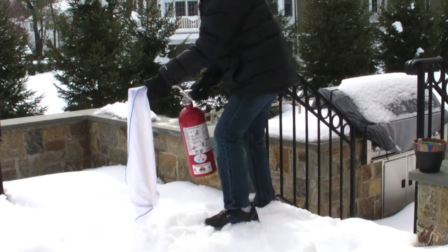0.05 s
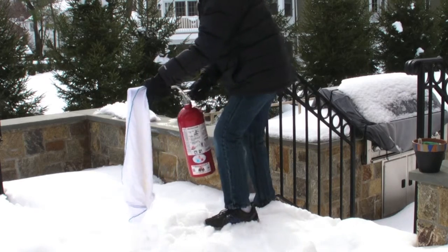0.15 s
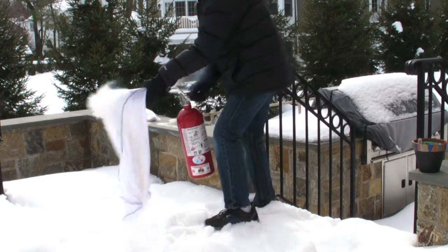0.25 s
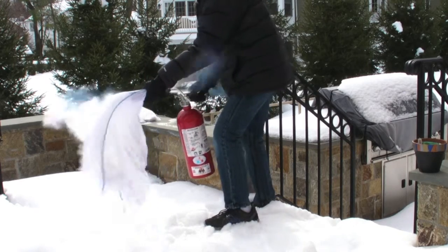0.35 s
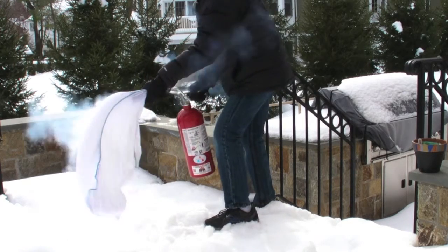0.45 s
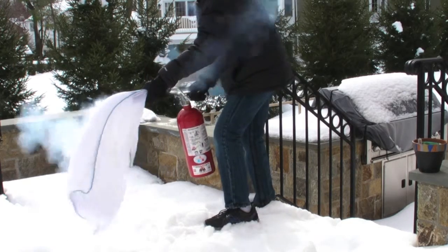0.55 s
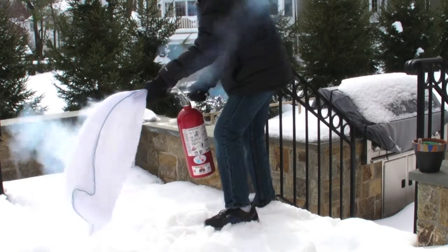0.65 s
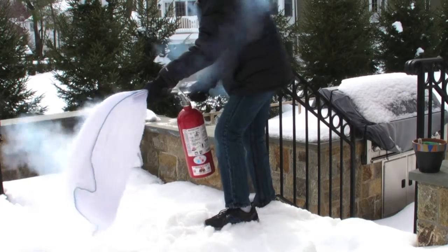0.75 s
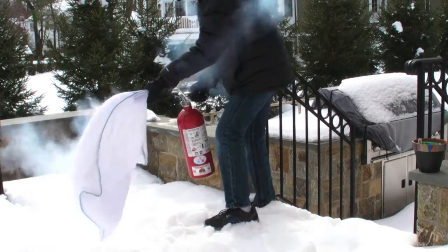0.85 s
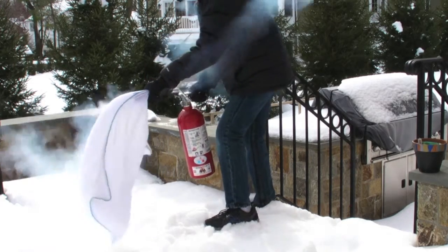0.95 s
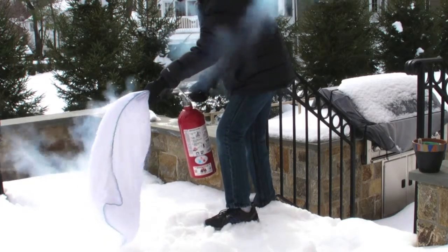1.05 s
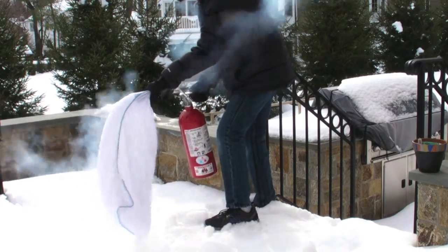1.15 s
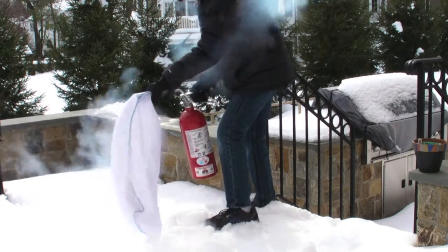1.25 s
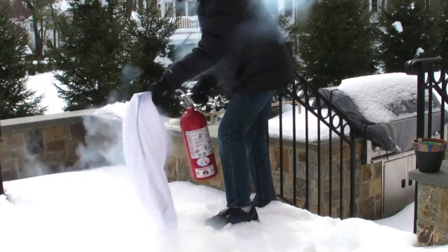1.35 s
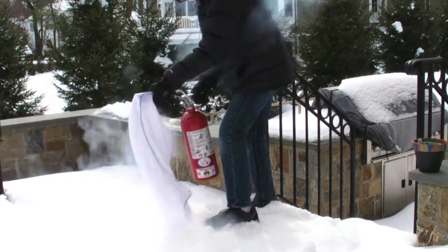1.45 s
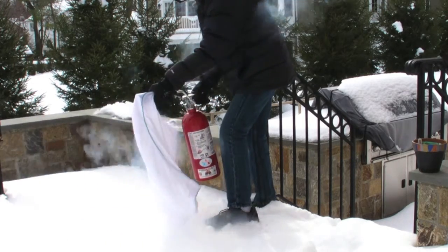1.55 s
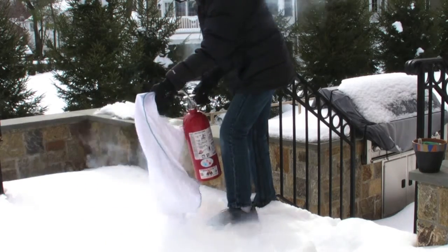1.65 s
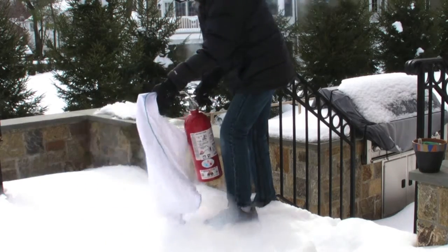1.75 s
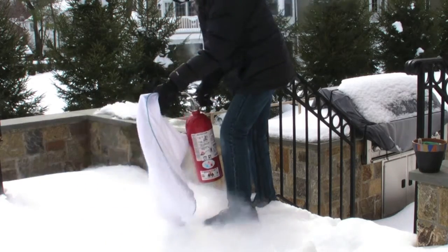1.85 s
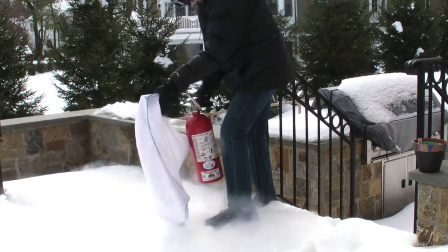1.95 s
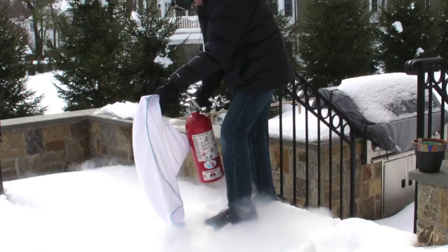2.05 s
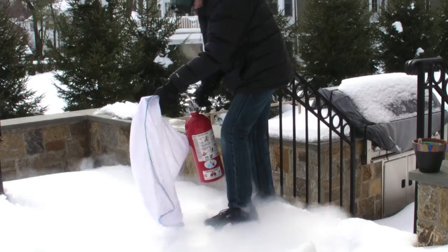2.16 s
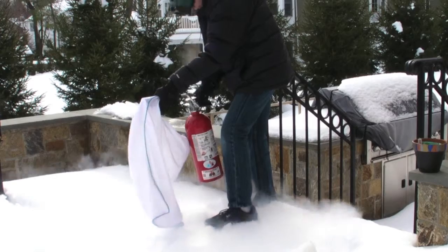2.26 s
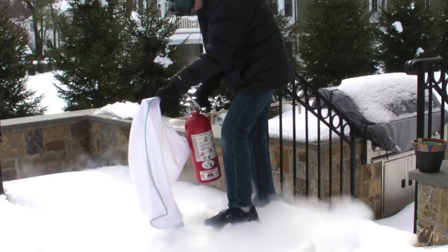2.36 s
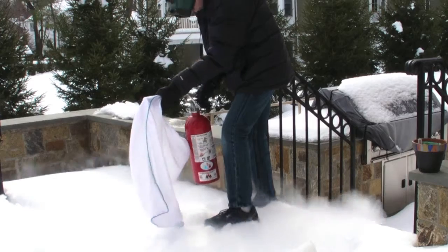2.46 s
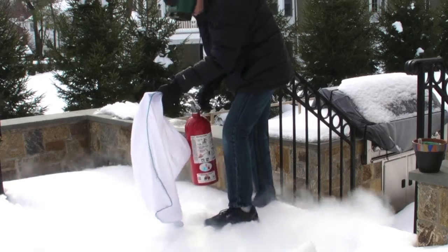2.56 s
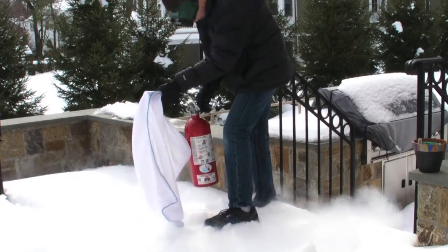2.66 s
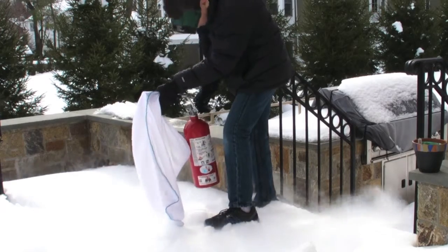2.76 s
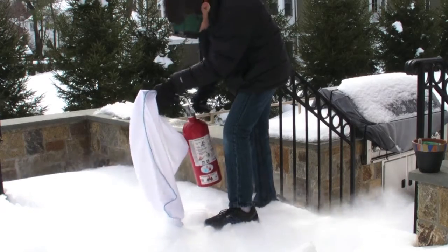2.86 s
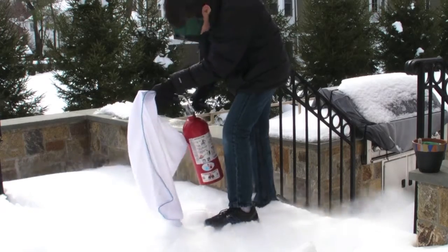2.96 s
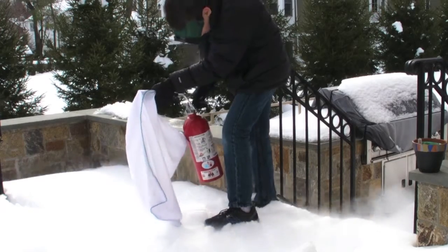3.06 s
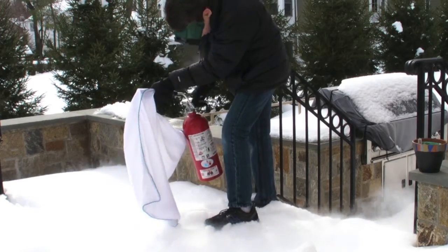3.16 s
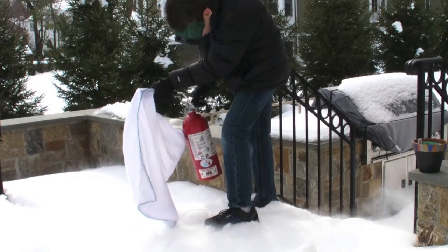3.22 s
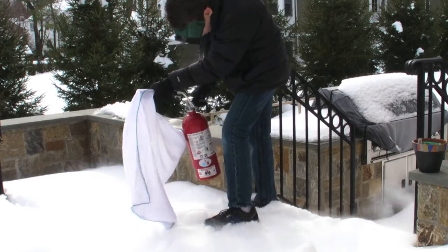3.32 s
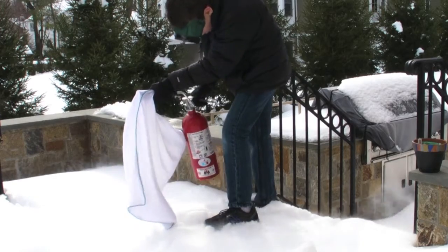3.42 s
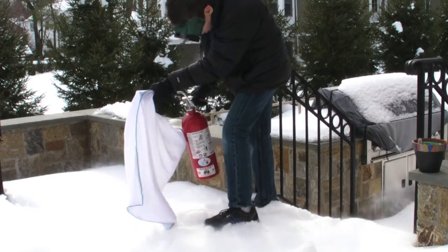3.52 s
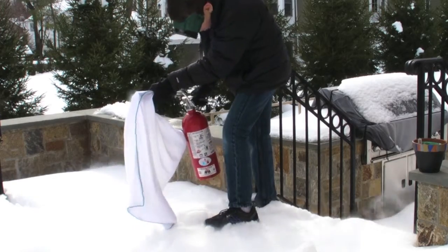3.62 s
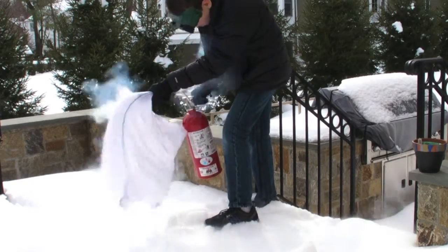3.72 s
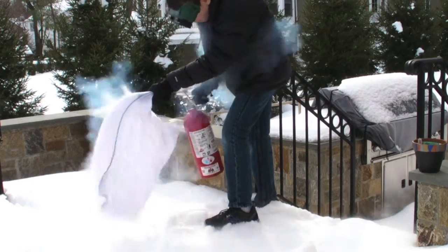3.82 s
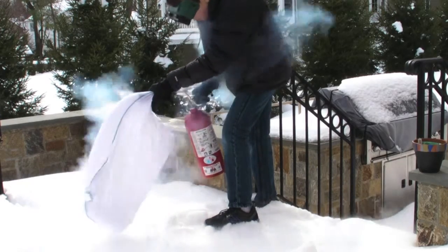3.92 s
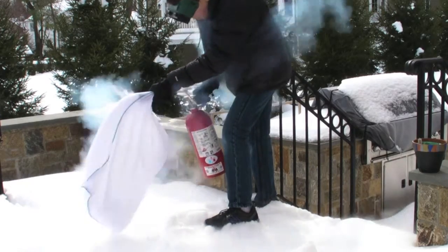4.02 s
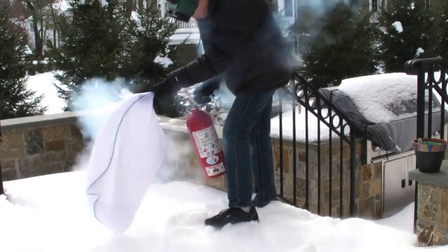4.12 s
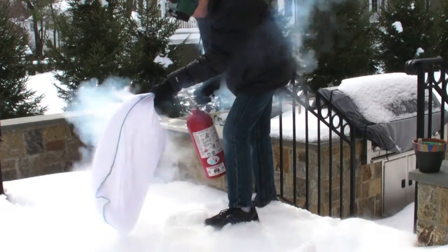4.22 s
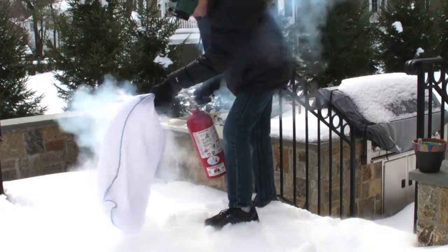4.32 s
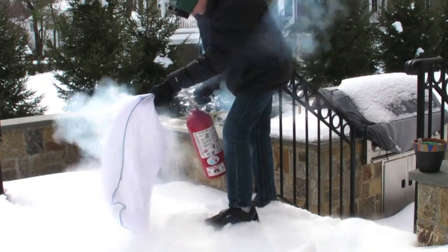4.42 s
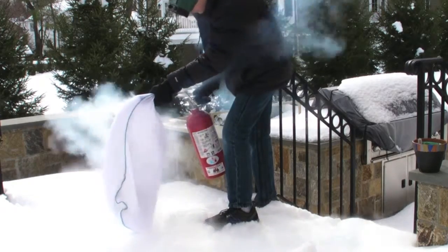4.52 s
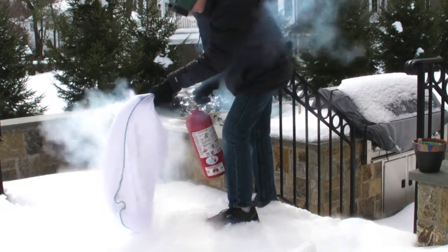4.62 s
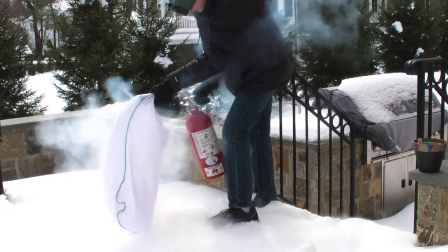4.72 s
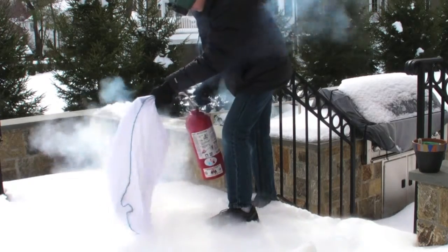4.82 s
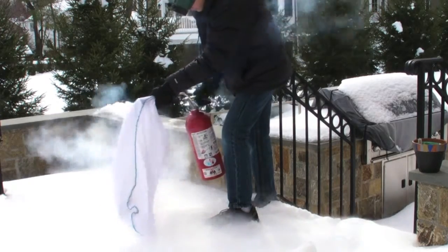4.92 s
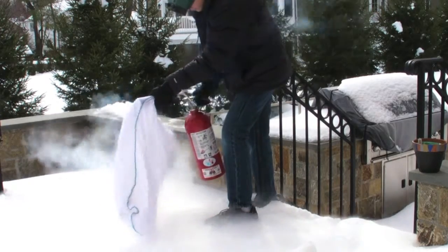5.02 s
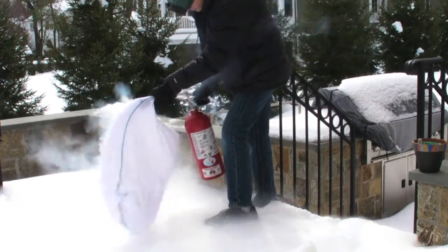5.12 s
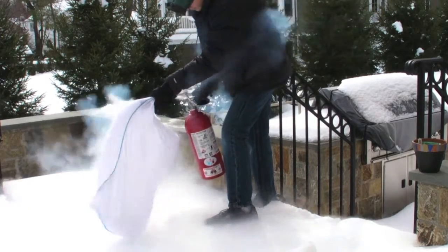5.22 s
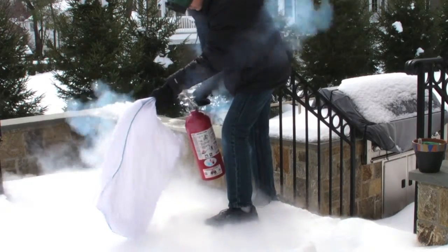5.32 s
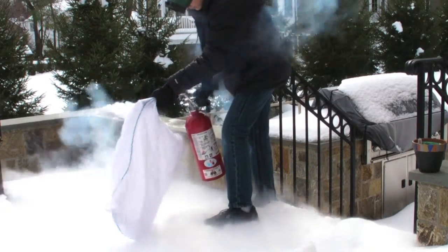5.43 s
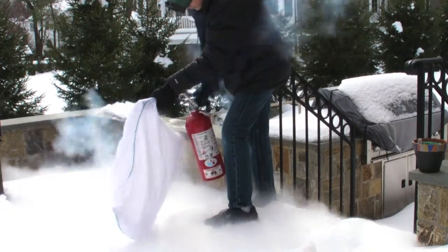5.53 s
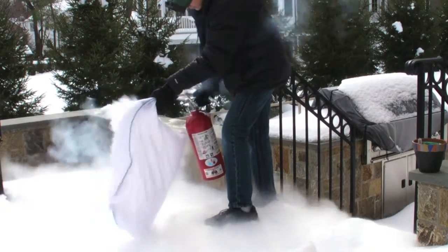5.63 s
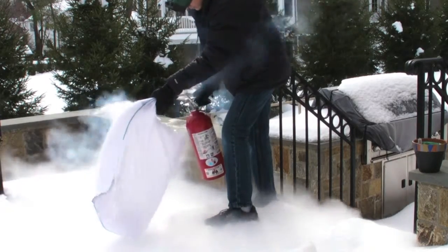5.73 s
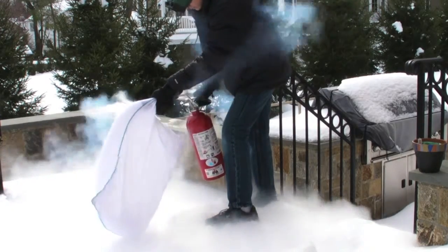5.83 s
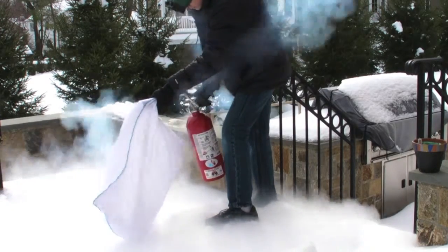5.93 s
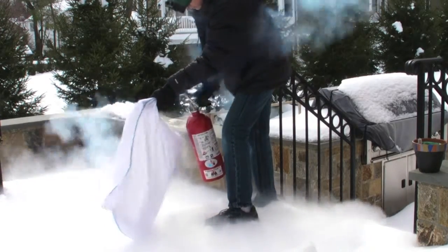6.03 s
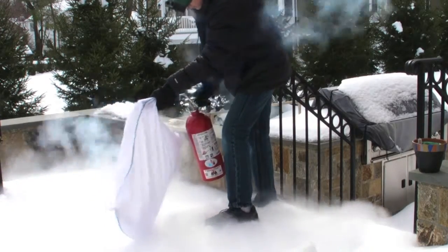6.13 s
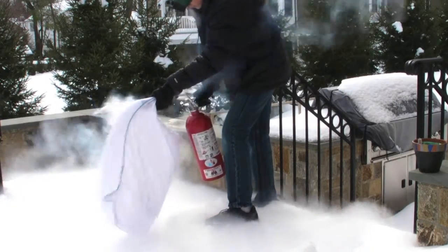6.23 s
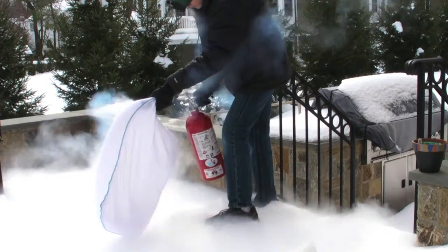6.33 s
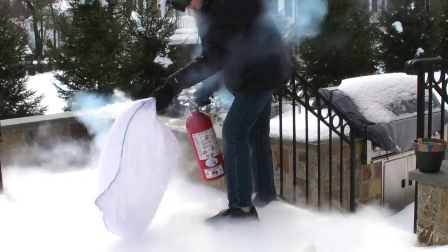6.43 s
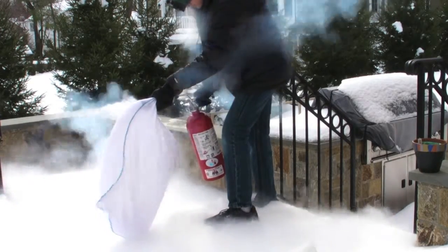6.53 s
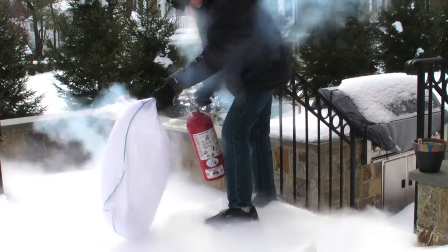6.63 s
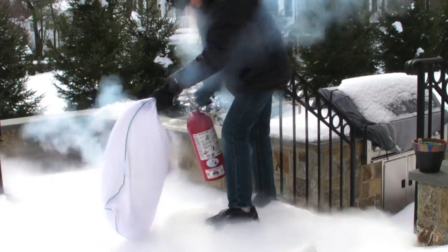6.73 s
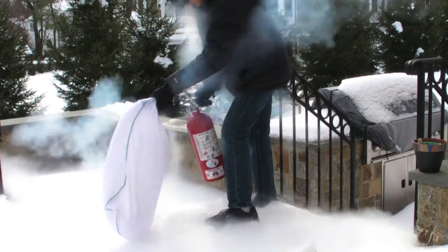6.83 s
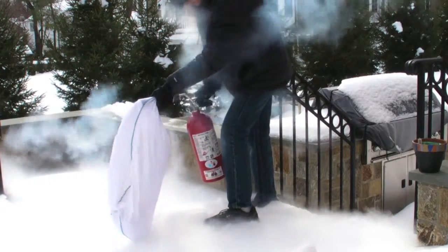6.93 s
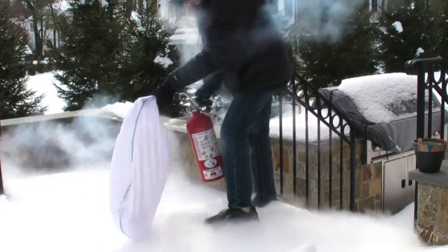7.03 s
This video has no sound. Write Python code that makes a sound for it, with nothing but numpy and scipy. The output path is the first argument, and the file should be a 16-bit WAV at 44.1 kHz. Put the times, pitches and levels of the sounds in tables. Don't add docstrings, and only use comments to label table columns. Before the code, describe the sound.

Outdoors over a soft distant traffic rumble, a gas extinguisher blasts loudly five times, two long and three shorter, cloth rustling in the gaps.

```python
import sys
import numpy as np
from scipy import signal
from scipy.fft import rfft, irfft, next_fast_len
from scipy.io import wavfile
from scipy.ndimage import uniform_filter1d

SR = 44100
rng = np.random.default_rng(int(sys.argv[2]) if len(sys.argv) > 2 else 0)


def pcm_store(signal):
    levels = np.round(np.clip(np.atleast_2d(signal), -1, 1) * 32767)
    wavfile.write(sys.argv[1], SR, levels.astype(np.int16).T)


N = 312088
SIZE = next_fast_len(N)
HZ = np.maximum(np.arange(SIZE // 2 + 1) * SR / SIZE, 1)
T = np.arange(N) / SR
SLOW = T[::16]


def undb(db):
    return np.exp(np.asarray(db) * np.log(10) / 20)


def at(table):
    hz, value = np.transpose(table)
    return np.interp(np.log(HZ), np.log(hz), value)


def edge(hz, order=4):
    return 1 / np.sqrt(1 + (HZ / hz) ** (2 * order))


def cut(x, hz):
    return irfft(rfft(x, SIZE) * edge(hz, order=80), SIZE)[:, :N]


def walk(rate):
    hold = int(SR / rate)
    steps = np.repeat(rng.standard_normal(N // hold + 1), hold)
    return uniform_filter1d(uniform_filter1d(steps, hold), hold)[:N]


def smooth(rows):
    return np.array([np.interp(T, SLOW, row) for row in rows])


def hump(peak, rise, fall):
    return undb(-20 * np.maximum((peak - SLOW) / rise, (SLOW - peak) / fall))


def noise(gain, lo_hz, hi_hz, alike, pan, paths=1):
    a, b = rfft(rng.standard_normal((2, SIZE)))
    shared = np.clip(at(alike), 0, 1)
    mid = np.sqrt((1 + shared) / 2) * a
    side = np.sqrt((1 - shared) / 2) * b
    turn = undb(at(pan) / 2)
    pair = gain * paths * np.array([(mid + side) * turn, (mid - side) / turn])
    band = np.abs(pair.mean(axis=0)[(HZ > lo_hz) & (HZ < hi_hz)])
    return irfft(pair, SIZE)[:, :N] * SIZE / np.sqrt(2 * np.sum(band ** 2))


# frequency in Hz, phase in radians.
LEAD = [(1400, -0.024), (2100, 0.66), (3200, 0.52), (4500, 1.78), (7300, 0.71), (10000, -0.57),
        (12000, 1.2)]
# left delay in ms, right delay in ms, left level in dB, right in dB.
ECHOES = [(3.1, 2.95, -14, -10), (5.1, 5.15, -18, -17), (6.85, 6.75, -14.5, -16.5), (11, 11.1, -18, -18),
          (13.6, 14.8, -21, -21), (17, 16.7, -20, -19.5)]


def arrivals():
    paths = np.exp(.5j * at(LEAD) * np.array([[1], [-1]]))
    for echo in np.array(ECHOES):
        delay_s, level_db = echo[:2, None] / 1000, echo[2:, None]
        paths = paths + undb(level_db) * edge(6000, order=1) * np.exp(-2j * np.pi * HZ * delay_s)
    return paths


PATHS = arrivals()
# frequency in Hz, likeness from 0 to 1.
NEAR_ALIKE = [(60, .95), (130, .84), (290, .95), (640, .86), (1410, .72), (3100, .55), (5000, .4),
              (8500, .55), (15000, .25)]
# frequency in Hz, left minus right in dB.
NEAR_PAN = [(60, -2), (110, 0.0), (200, 1.5), (380, 0.5), (700, 1.5), (1290, 0.5), (2380, 2), (4400, 0.0),
            (8120, 1.5), (15000, -7)]


def near(gain, lo_hz, hi_hz):
    return noise(gain, lo_hz, hi_hz, NEAR_ALIKE, NEAR_PAN, PATHS)


# frequency in Hz, level in dB per Hz.
TERRACE = [(12, -38), (20, -12), (74, 1), (196, -11.5), (238, -15), (259, -13.5), (428, -23.5), (565, -32),
           (649, -28.5), (1040, -31.5), (1380, -37), (1580, -32.5), (2270, -39.5), (15500, -45)]
# frequency in Hz, likeness from 0 to 1.
FAR_ALIKE = [(60, 1), (130, 0.97), (290, 0.89), (640, 0.54), (1410, 0.2), (3100, 0), (6820, 0.1),
             (15000, 0.02)]
# frequency in Hz, left minus right in dB.
FAR_PAN = [(60, 0.64), (110, 0.87), (200, 1.5), (380, 1.0), (700, 0.5), (1290, 0.64), (2380, 0.55),
           (4400, 0.0), (8120, 0.0), (15000, -1.0)]


def terrace():
    colour, bass = undb(at(TERRACE)), edge(395, order=2)
    rumble = noise(colour * bass, 20, 400, FAR_ALIKE, FAR_PAN)
    rumble = rumble * undb(1.0 * walk(0.91) + 2.5 * walk(12))
    air = noise(colour * np.sqrt(1 - bass ** 2), 390, 5000, FAR_ALIKE, FAR_PAN)
    return undb(-40) * (rumble + undb(-11.5) * air)


# seeping treble in dB, cloud from the sagging bag in dB.
LEFT = [(-42, -39), (-43, -46), (-41.5, -43.5), (-44.5, -46), (-42, -48)]
# peak after the shut in seconds, rise and fall in seconds per 20 dB,
# middle over treble in dB, horn ring over treble in dB.
LEFTOVER = (.23, .9, .25, -8, 6)


def leftover(column):
    after, rise, fall = LEFTOVER[:3]
    total = 0
    for (_, shut, *_), left in zip(SQUEEZES, LEFT):
        begun = np.clip((SLOW - shut) / .07, 0, 1)
        total = total + undb(left[column]) * begun * hump(shut + after, rise, fall)
    return total


# peak in seconds, rise and fall in seconds per 20 dB, treble in dB,
# middle over treble in dB.
RUSTLES = [(0.01, .1, .3, -49, -9), (.12, .15, .06, -52, -10), (.21, .04, .05, -54, -16),
           (1.672, .01, .03, -46, -24), (1.92, .3, .4, -50, -6.5), (2.15, .12, .06, -54, -12),
           (2.258, .008, .14, -41, -15), (2.36, .12, .2, -47, -13), (2.46, .15, .07, -49, -14),
           (2.68, .5, .5, -55, -9), (2.92, .5, .1, -53.5, -12), (3.1, .012, .13, -42, -18),
           (3.26, .02, .08, -51, -18), (3.42, .3, .3, -60, -6), (5.05, .1, .05, -39, -12)]


def seep():
    middle_db, ring_db = LEFTOVER[3:]
    gas = leftover(column=0)
    cloth = np.array([undb(db) * hump(s, rise, fall) for s, rise, fall, db, _ in RUSTLES])
    treble = near(undb(at(NOZZLE)) * np.sqrt(1 - edge(5600) ** 2), 5500, 13000) * undb(2.3 * walk(250))
    middle = near(edge(3600, order=2) * np.sqrt(1 - edge(900, order=1) ** 2), 3000, 5300)
    middle = middle * undb(2.0 * walk(40))
    modes = 1 / np.abs(1 + 1j * (HZ - 675) / 28) + 0.48 / np.abs(1 + 1j * (HZ - 320) / 40)
    ring = near(modes, 550, 800) * undb(ring_db - 5.0 + 2.0 * walk(20))
    bright = gas + np.sqrt((cloth ** 2).sum(axis=0))
    dull = undb(middle_db) * gas + np.sqrt(undb(2 * np.array(RUSTLES)[:, -1]) @ cloth ** 2)
    bright, dull, gas = smooth([bright, dull, gas])
    return undb(-1.5) * (bright * treble + dull * middle + gas * ring)


def flow_db(start, shut, over_db, surge_db, gasp_db, outlasts, drop_db, fade):
    surge_s, gasp_s, drop_s = .2, .06, .015
    gone = np.maximum(SLOW - shut - outlasts, 0)
    gasp = np.clip(1 + (SLOW - shut) / gasp_s, 0, 1)
    surge = np.exp(-np.maximum(SLOW - start, 0) / surge_s)
    return over_db + surge_db * surge + gasp_db * gasp + drop_db * np.minimum(gone / drop_s, 1) - fade * gone


# valve opens and shuts in seconds, flow in dB, spit in dB,
# wait for the liquid in seconds.
SQUEEZES = [
    (0.2603, 1.303, -20.2, -7, 0.04),
    (3.6895, 4.838, -20.2, -7.5, .03),
    (5.0933, 5.425, -19.1, -10, .03),
    (5.653, 5.985, -19.3, -8, 0.027),
    (6.2066, 6.928, -19.7, -9, 0.026),
]
# low whistle in dB, high whistle in dB.
PUFFS = [(-17, -8), (-11, -13), (-8, -13), (-14, -12), (-14, -12)]
# level over flow in dB, first surge in dB, last gasp in dB,
# time it outlasts the valve in seconds, drop in dB, fade in dB per second.
LAYERS = [
    (2.0, 2.6, -1.8, .006, -4.5, 235),
    (.5, 2.2, -.8, .02, -2.1, 310),
    (.1, 1.1, 1.6, .036, -.4, 345),
]
# centre in Hz, width in Hz, level in dB.
HORN = [(260, 60, -3), (350, 52, -8.5), (458, 41, -9.5), (570, 31, -18.5), (698, 87, 1.5), (868, 73, -5),
        (982, 150, -4.5), (1189, 57, -7.5), (1343, 144, -1.5), (1470, 86, -4.5), (1612, 90, -5),
        (1980, 124, -6), (2264, 226, -8.5), (2976, 310, -12.5), (3620, 59, -13), (4620, 490, -15.5)]
# frequency in Hz, level in dB per Hz.
NOZZLE = [(1760, -26), (3000, 8), (3260, -15), (3640, 0.5), (5650, -8.5), (7230, -8), (8950, 0.5),
          (10800, -9), (13200, -15), (14600, -21), (15500, -26)]
# frequency in Hz, level in dB per Hz.
SPIT = [(88, -48), (150, -17), (1110, -9), (1480, -5.5), (1870, -11.5), (3620, -9.5), (5030, -14.5),
        (8830, -0.5), (12800, -15.5), (15500, -27)]


def blasts(fill_db=-22, rise_db=-36, lead_db=-17):
    opening_s, swell_s = .014, .014
    spit_lasts = 5.8
    horn = np.abs(sum(undb(db) / (1 + 1j * (HZ / w - f * f / (HZ * w))) for f, w, db in HORN))
    horn = np.sqrt(horn ** 2 + undb(fill_db) ** 2) * np.sqrt(1 - edge(220, order=5) ** 2)
    split, top = edge(1120, order=8), edge(5280, order=3)
    gust = .7 * walk(5)
    low = near(horn * split, 180, 1450) * undb(gust + 1.6 * walk(25))
    upper = near(horn * np.sqrt(1 - split ** 2) * top, 1180, 5500)
    upper = upper * undb(gust + 1.0 * walk(30) + 1.15 * walk(300))
    hiss = near(undb(at(NOZZLE)) * np.sqrt(1 - top ** 2), 6400, 10700)
    hiss = hiss * undb(gust + 1.0 * walk(20) + 1.43 * walk(500))
    spit = near(undb(at(SPIT)), 150, 16000) * undb(1.8 * walk(600))
    rings = [near(1 / np.abs(1 + 1j * (HZ - hz) / width) ** 2, 150, 16000)
             for hz, width in ((1450, 210), (3900, 600))]
    gains = 0
    for (start, end, db, spit_db, late), ring_db in zip(SQUEEZES, PUFFS):
        low_db, upper_db, hiss_db = (db + flow_db(start, end, *layer) for layer in LAYERS)
        age = SLOW - start
        shut = np.clip(1 - age / opening_s, 0, 1)
        liquid = np.clip((age - late) / (swell_s * (late / .03) ** 2.2), 0, 1)
        flow = [liquid * undb(low_db), liquid * undb(upper_db), np.sqrt(liquid) * undb(hiss_db)]
        fade_db = -60 * np.maximum(age - opening_s, 0) / (spit_lasts * late)
        puff = undb(spit_db + rise_db * shut ** 1.18 + fade_db)
        hose = undb(spit_db + lead_db * shut + 3.2 * fade_db)
        whistles = [hose * undb(whistle_db) for whistle_db in ring_db]
        gains = gains + (age > 0) * np.array(flow + [puff] + whistles)
    layers = [low, upper, hiss, spit] + rings
    return cut(sum(gain * layer for gain, layer in zip(smooth(gains), layers)), 14900)


def bag(loud):
    boom_db = -26.5
    boom = near(1 / np.abs(1 + 1j * (HZ - 105) / 30) ** 2, 60, 160)
    boom = boom * undb(boom_db - 20 + 2.5 * walk(2.96))
    cloud = near(edge(1600, order=2) * np.sqrt(1 - edge(500, order=2) ** 2), 850, 2300)
    return loud * boom + undb(-1.5) * smooth([leftover(column=1)]) * cloud


# start in seconds, peak in dB, centre in Hz.
TICKS = [(1.6462, -34, 8900), (1.6714, -28, 8660), (1.9144, -38, 2990), (2.0243, -37, 8770),
         (2.0538, -44, 2000), (2.47, -42, 3900), (2.2517, -25, 8680), (2.2618, -20, 6700),
         (2.2754, -31, 8790), (2.2984, -31, 9290), (2.3291, -32, 7000), (2.3604, -35, 8900),
         (2.482, -29, 9330), (2.9444, -38, 8490), (3.0779, -40, 8660), (3.0954, -32, 7950),
         (3.1024, -33, 9180), (3.1223, -28, 9520), (3.1284, -37, 7310), (3.2565, -39, 9790),
         (5.0519, -31, 8380)]


def ticks():
    t60_s = .028
    out, age = np.zeros((2, N)), np.arange(2048) / SR
    bright = near(undb(.5 * at(NOZZLE)), 2500, 14000)
    for s, db, hz in TICKS:
        i = int(s * SR)
        b, a = signal.butter(2, [hz / 1.6, min(hz * 1.35, .45 * SR)], "bandpass", fs=SR)
        crack = signal.lfilter(b, a, bright[:, i:i + len(age)]) * undb(-60 * age / t60_s)
        out[:, i:i + len(age)] += undb(db) * crack / np.abs(crack.mean(axis=0)).max()
    return out


# start and length in seconds, from Hz, to Hz, level in dB.
WHEEZES = [(3.0, .55, 1630, 1520, -57), (3.05, .5, 700, 670, -60), (1.9, .33, 1760, 1690, -58.5),
           (1.89, .2, 2500, 2000, -57), (1.89, .1, 2900, 2700, -58)]


def wheezes():
    width_hz, edge_s = 300, .06
    breadth = np.array([walk(width_hz) for _ in range(4)]).reshape(2, 2, N)
    out = 0
    for s, length, from_hz, to_hz, db in WHEEZES:
        turn = 2 * np.pi * np.cumsum(np.interp(T, [s, s + length], [from_hz, to_hz])) / SR
        gate = np.clip(np.minimum(T - s, s + length - T) / edge_s, 0, 1)
        out = out + undb(db) * gate * (breadth[0] * np.cos(turn) + breadth[1] * np.sin(turn))
    return out + out.mean(axis=0)


# time in seconds, pitch in Hz, level in dB.
CHIRP = [
    (3.385, 3750, -64),
    (3.405, 3680, -55),
    (3.43, 3350, -64),
]


def bird():
    s, hz, db = np.transpose(CHIRP)
    level_db = np.interp(T, s, db, -120, -120) + 1.5 * walk(170) + 2.5
    return undb(level_db) * np.sin(2 * np.pi * np.cumsum(np.interp(T, s, hz)) / SR)


GAPS = [.012, 0.0085, 0.0033, 0.0022, 0.0065]


def scene():
    duck_db, recover_s = -10, .15
    jet = blasts()
    loud = np.clip(uniform_filter1d(np.abs(jet).mean(axis=0), 600) / 0.059, 0, 1)
    keep = np.exp(-1 / (recover_s * SR))
    held = np.maximum(loud, signal.lfilter([1 - keep], [1, -keep], loud))
    quiet = seep() + wheezes() + ticks() + bird() + undb(duck_db * held) * terrace()
    ahead = sum((T > start - gap) & (T < start) for (start, *_), gap in zip(SQUEEZES, GAPS))
    dull = signal.sosfiltfilt(signal.butter(4, 3000, fs=SR, output="sos"), quiet)
    return jet + bag(loud) + quiet + uniform_filter1d(1. * ahead, 60) * (dull - quiet)


def band_limit(x):
    return signal.sosfilt(signal.butter(12, 15300, fs=SR, output="sos"), x)


def record(dry):
    return band_limit(np.clip(cut(dry, 15600), -.99, .99))


dry = scene()
out = record(dry)
pcm_store(out)
```